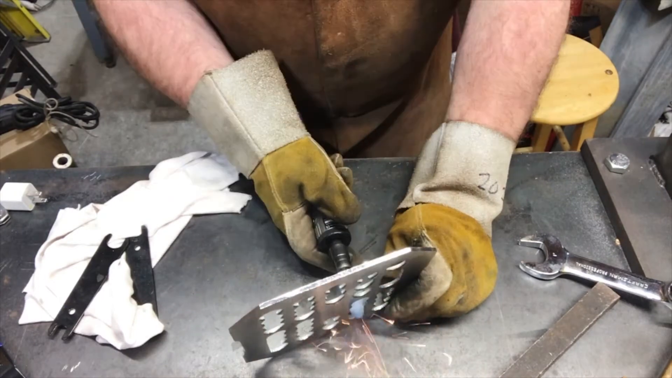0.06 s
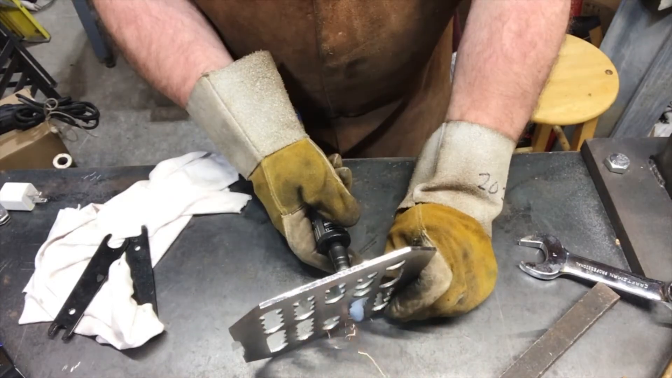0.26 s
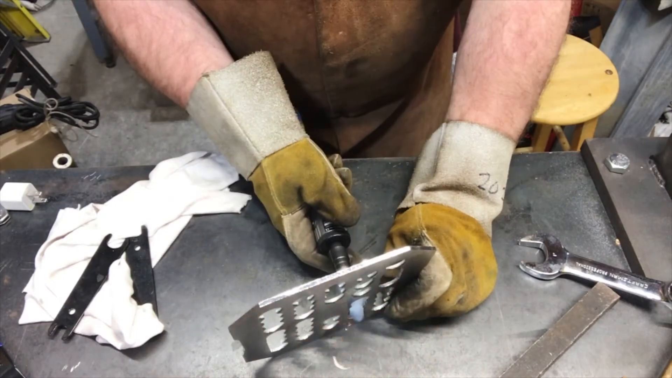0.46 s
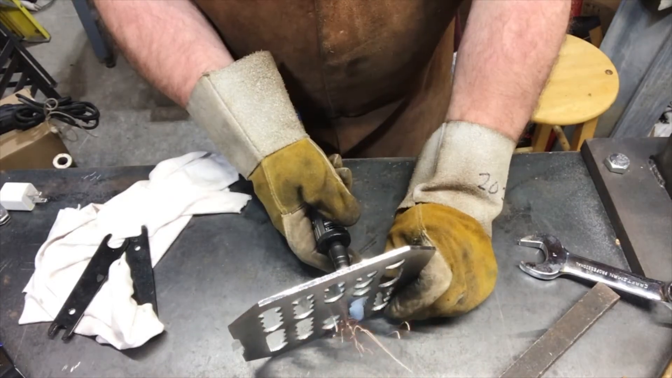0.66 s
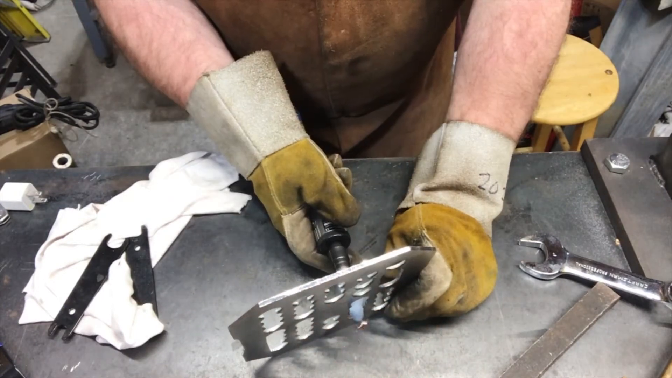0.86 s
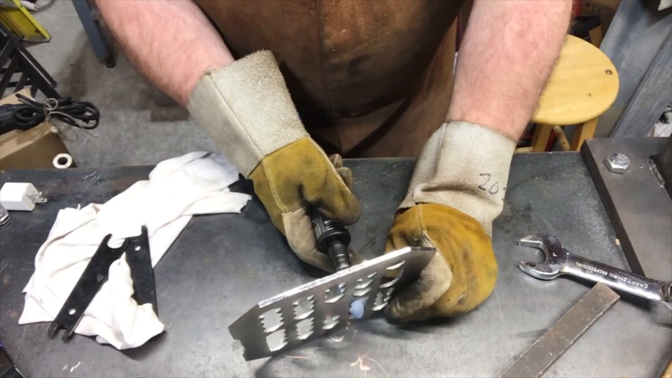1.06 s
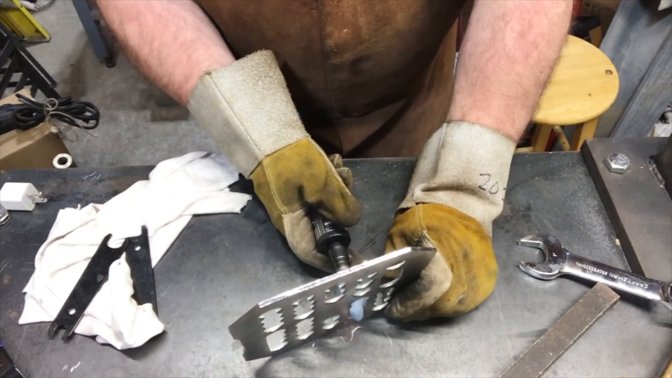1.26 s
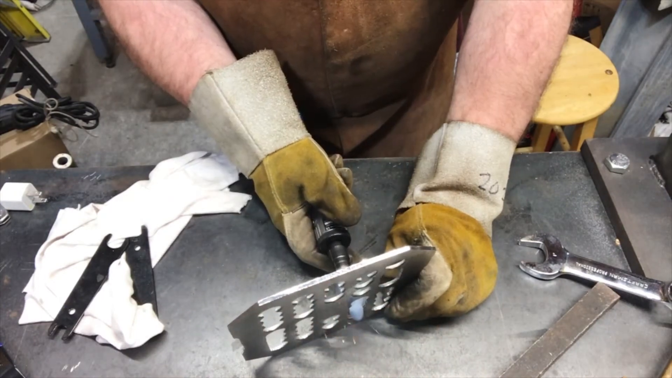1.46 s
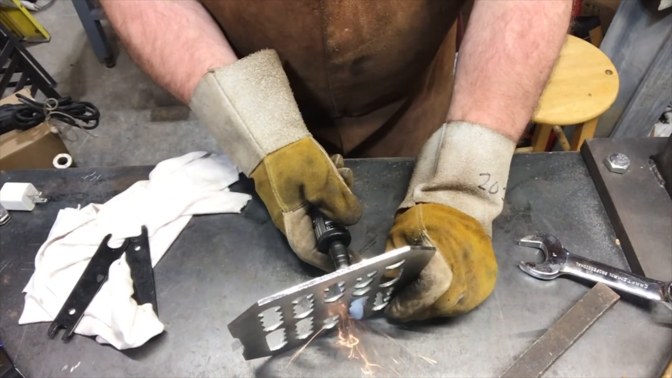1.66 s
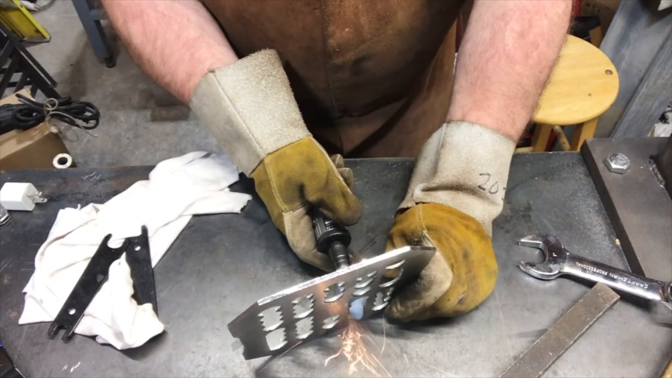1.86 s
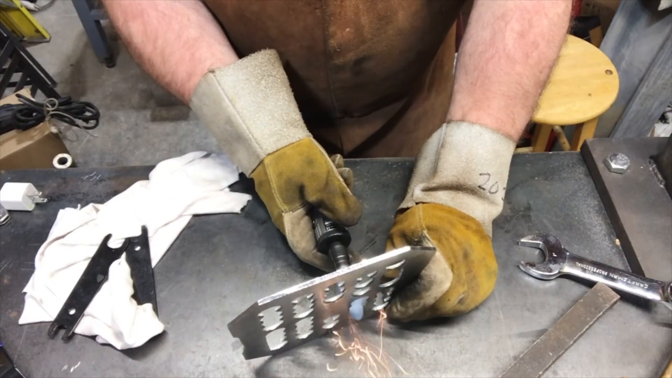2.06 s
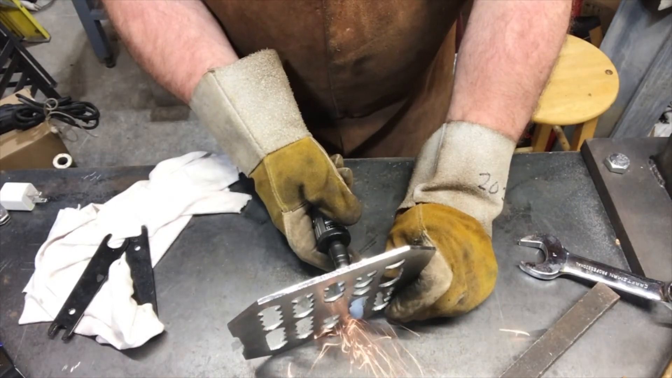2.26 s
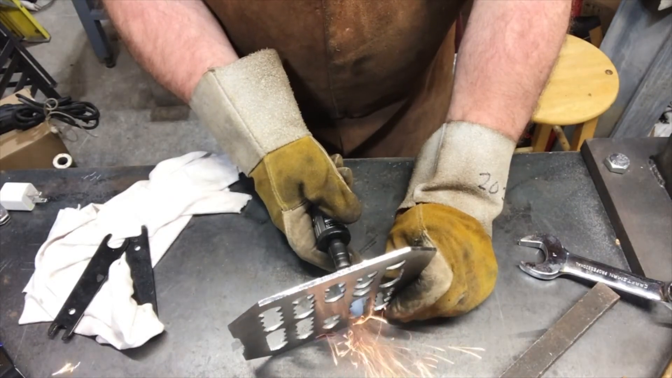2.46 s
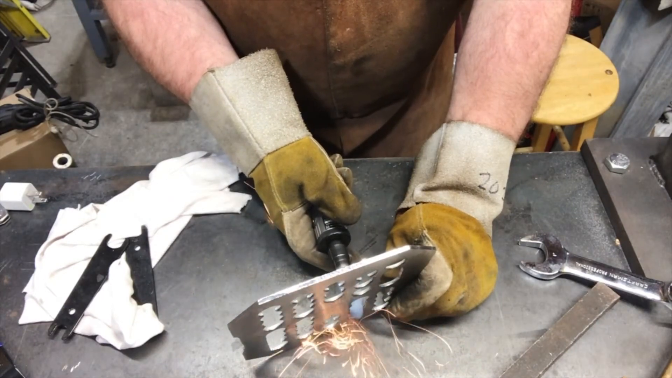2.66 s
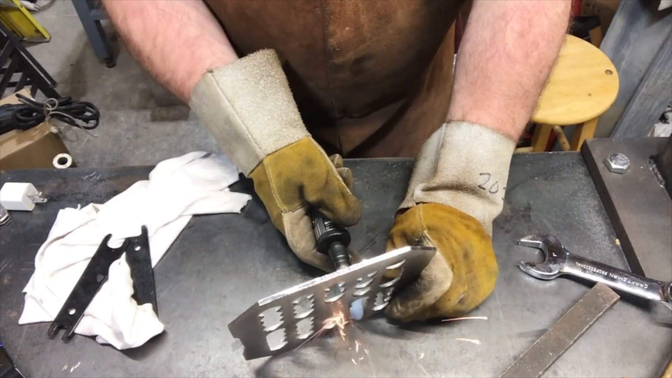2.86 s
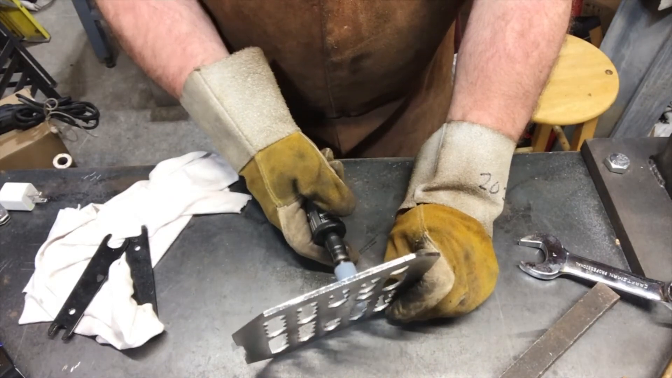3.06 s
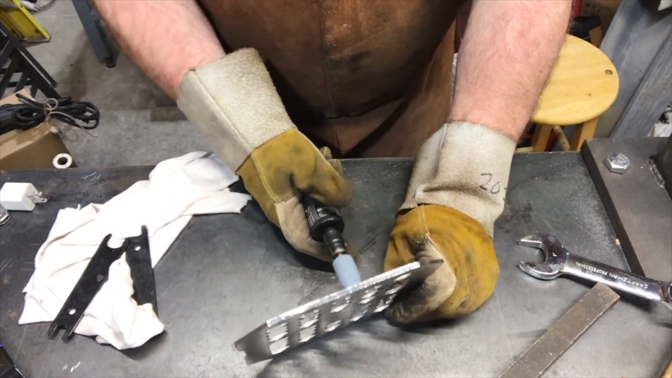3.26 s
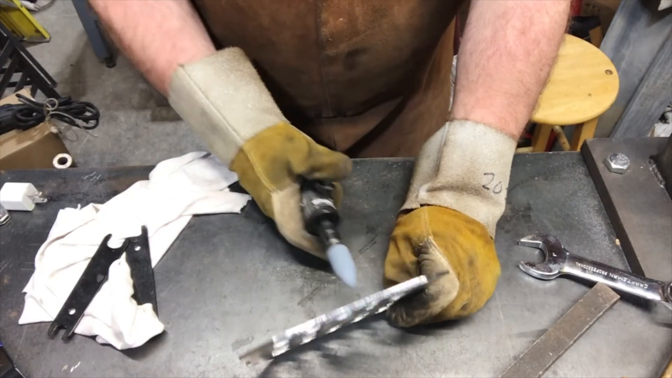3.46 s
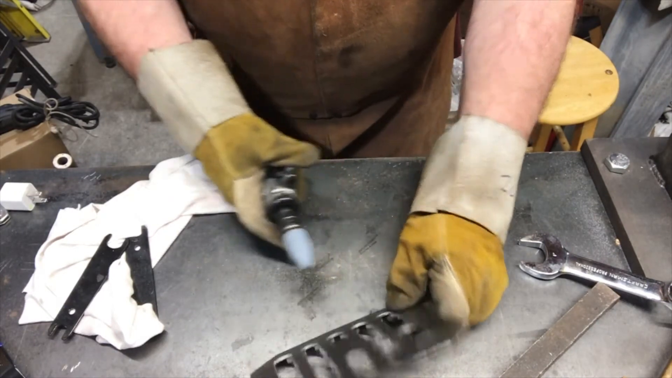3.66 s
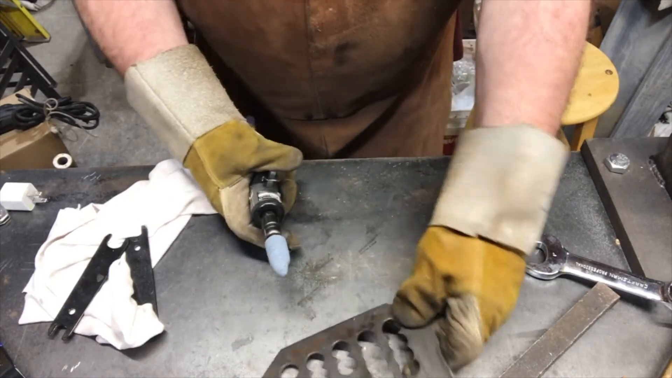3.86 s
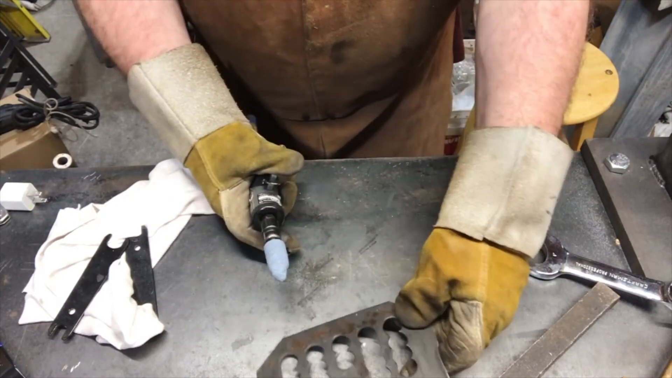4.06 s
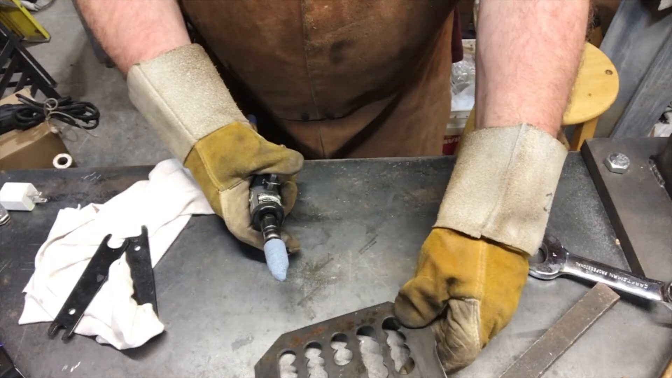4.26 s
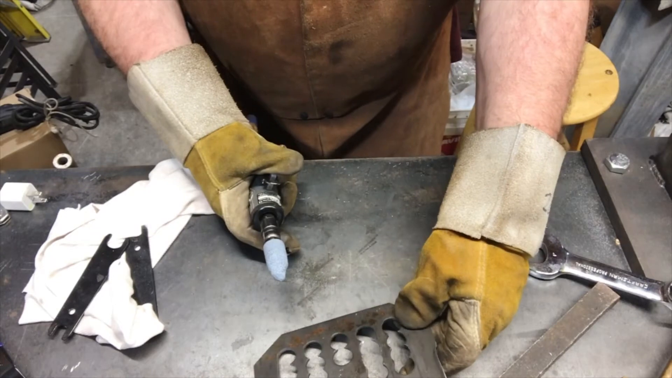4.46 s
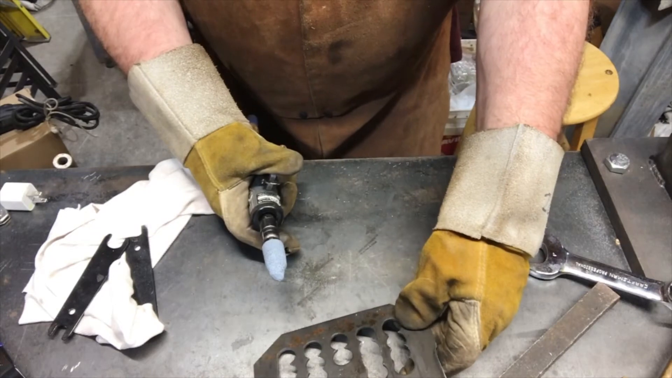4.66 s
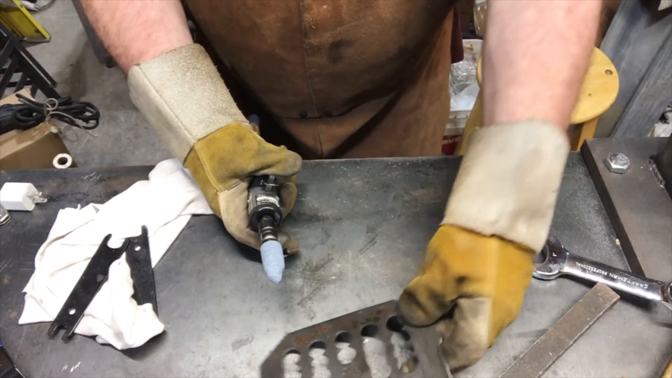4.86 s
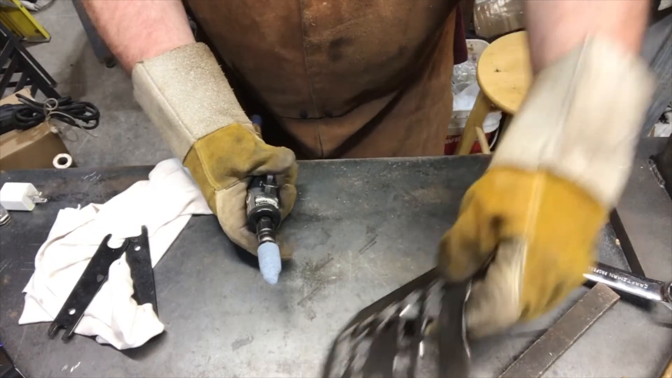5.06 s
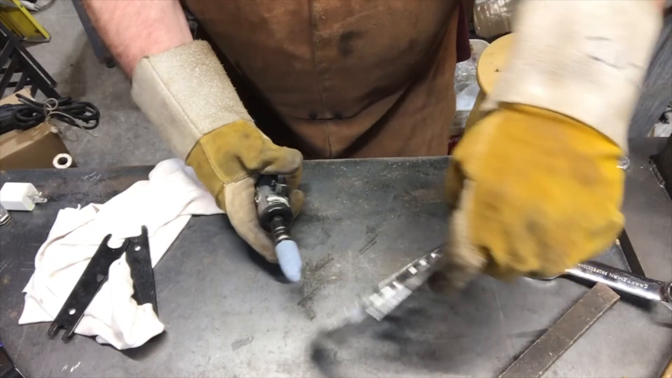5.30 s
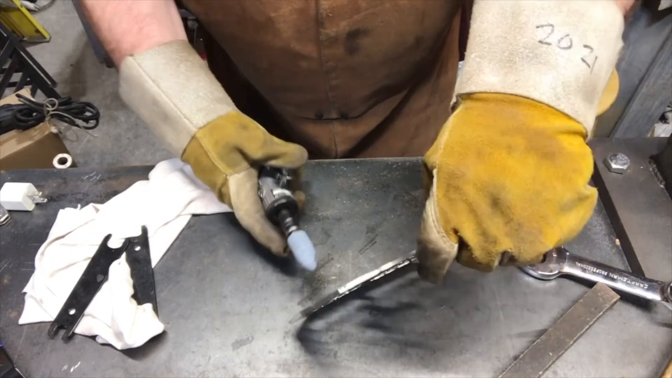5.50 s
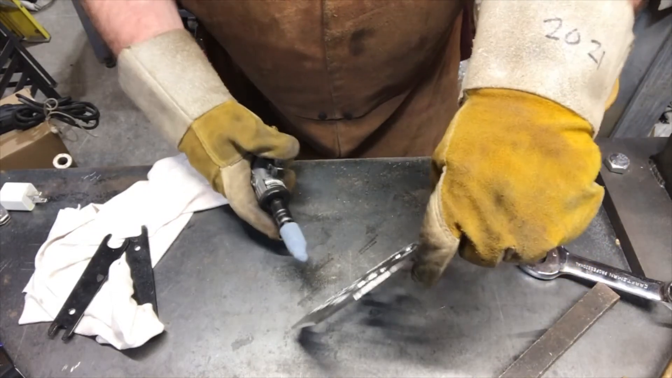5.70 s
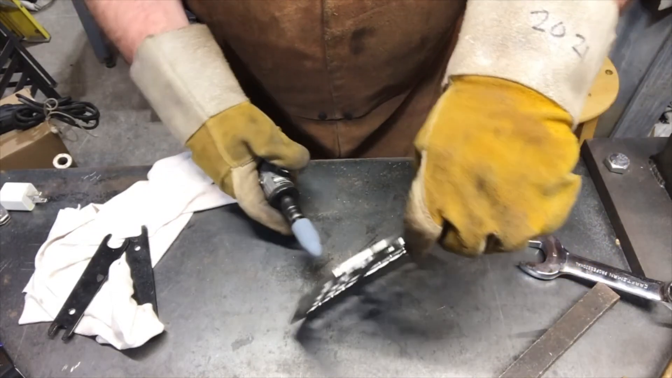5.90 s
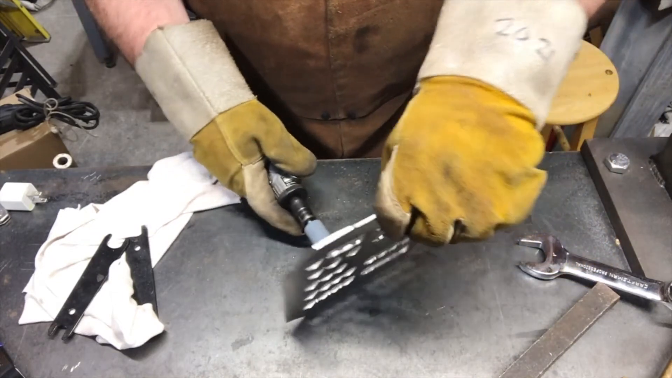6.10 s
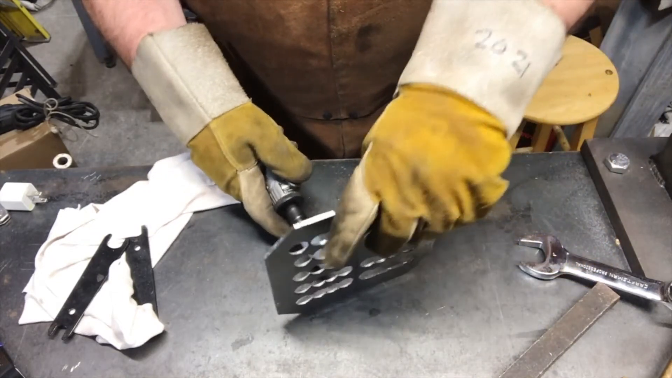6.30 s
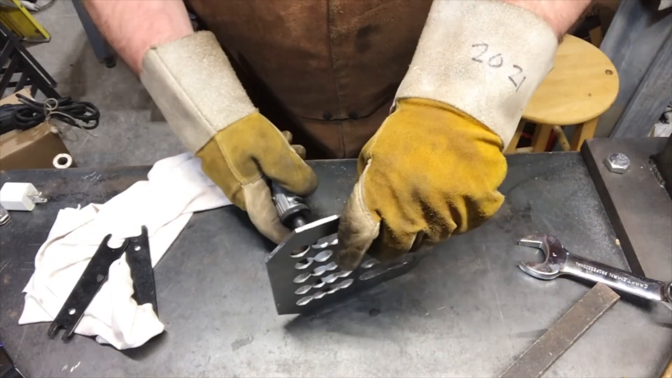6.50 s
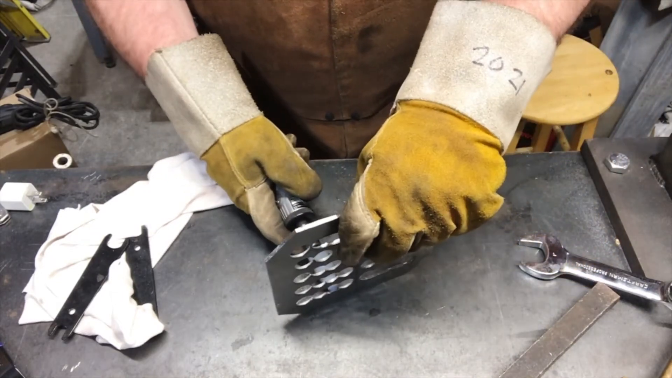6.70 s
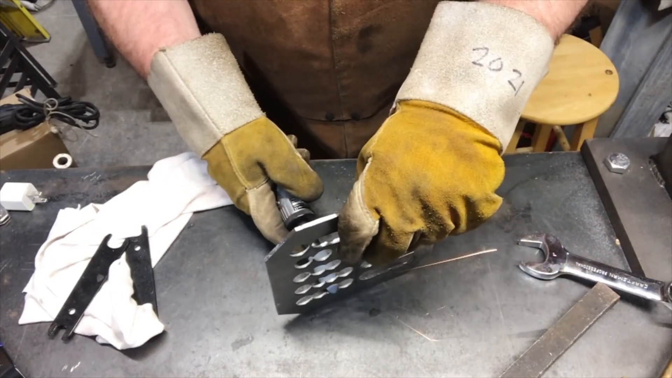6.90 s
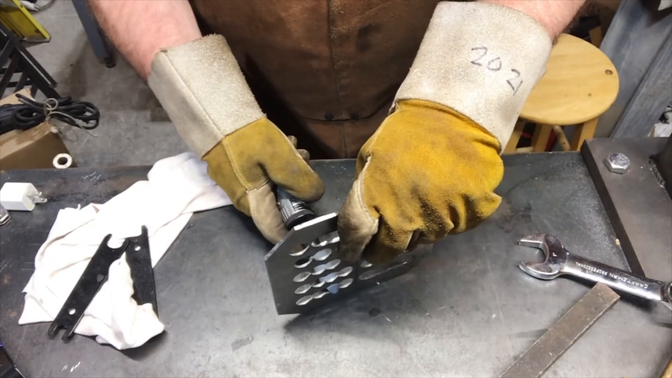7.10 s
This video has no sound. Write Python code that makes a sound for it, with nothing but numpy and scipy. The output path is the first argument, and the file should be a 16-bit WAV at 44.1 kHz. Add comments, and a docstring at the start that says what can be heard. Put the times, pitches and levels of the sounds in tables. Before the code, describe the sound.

A pneumatic die grinder whines and hisses as its stone tip bites a steel grate, drawing brief, thin squeals. The tool lifts off and winds down quickly, leaving a compressor droning in the background. The grate scrapes faintly and clinks on the workbench. Then the grinder spins up with a burst of air and goes back to grinding, close to the microphone in a garage.

```python
"""A four-vane air grinder whines and hisses while its stone bites a steel grate, which squeals.
The rotor sings at its shaft orders; the vanes chop the turbulent exhaust air.
The lever is released, the rotor spins down, the grate clinks on the bench, and the tool runs up again.
A piston compressor drones behind, heard best in the pause. Garage, close mono microphone."""
import sys
import numpy as np
from scipy import signal
from scipy.fft import rfft, irfft, next_fast_len
from scipy.io import wavfile
from scipy.ndimage import uniform_filter1d, map_coordinates

SR = 44100
rng = np.random.default_rng(int(sys.argv[2]) if len(sys.argv) > 2 else 0)


def generate_wav(sig):
    """Save sig (samples, or channels by samples) to the path in sys.argv[1] as 16-bit PCM at SR."""
    pcm = np.round(np.clip(np.atleast_2d(sig).T, -1, 1) * 32767).astype(np.int16)
    wavfile.write(sys.argv[1], SR, pcm)


N = 314874

# Rotor, lever held: time_s, shaft_hz, stone_pressure (about 0-1), vane_octave_swell_db
ROTOR_TRACK = [(0, 380.3, 0.1, -1), (.25, 382.5, 0.13, 0.5), (.8, 386.2, .1, -1.5), (1.04, 389.8, 0, 2),
               (1.42, 385, 0, -3), (1.57, 374, 0, 3), (1.68, 367, 0.35, -1), (1.82, 357.4, .92, -3),
               (2.06, 348.4, 1, 1), (2.22, 353, 1.06, -2), (2.42, 347, 0.69, 0.5), (2.52, 340, 1, -0.5),
               (2.68, 344.7, .7, 0.5), (2.8, 343.6, 0.81, -0.5), (2.92, 387.7, 0, 0),
               (3.05, 396.2, 0.06, 1.5), (3.28, 399.3, 0.01, 0), (6.06, 421.8, 0.01, 1),
               (6.28, 414, .15, -3.5), (6.42, 413.2, 0.16, -3), (6.51, 412, 0.68, -13),
               (6.77, 411.8, 0.77, -8), (6.89, 405, .82, 3), (7.02, 399, 1, 1), (7.14, 398.6, 0.99, -2)]
# Strong shaft orders: multiple, light_db, pressed_db, free_db, restart_light_db, restart_pressed_db,
# coast_db, run_up_db (last two add to the port response)
STRONG_ORDERS = [(1, -70.5, -53.5, -68, -65, -59, -40, -30), (2.003, -57.5, -65, -60.5, -55, -69, -34, -15),
                 (2.995, -57.5, -53, -67, -60, -65, -32, -25),
                 (3.997, -51, -39.5, -48.5, -48, -35, -0.5, -0.5),
                 (5.993, -55.5, -53, -58, -49, -36, -25, -23),
                 (7.99, -44.5, -44, -41.5, -34.5, -43, -18.5, -17),
                 (11.97, -41.5, -48, -41, -54, -43, -35, -30), (15.8, -70, -70, -70, -70, -70, -35, -45),
                 (20.2, -70, -70, -70, -70, -70, -44, -45), (23.9, -55, -59, -65, -70, -70, -43, -45)]
# Weak shaft orders: multiple, level_db, free_gain_db, restart_gain_db
WEAK_ORDERS = [(5, -60, 2, 4), (7, -59.5, 5, 5.5), (9, -59, 8, 8.5), (10, -57, 11, 1), (11, -51, 7, -12),
               (13, -53, -2, -6)]
# Exhaust port response: freq_hz, coast_db, run_up_db
PORT_RESPONSE = [(150.4, -94, -78), (279.6, -51, -44), (525, -35.5, -30), (680, -29, -35), (809, -21, -39),
                 (1040, -22, -34), (1270, -28.5, -41), (1770, -40, -35), (2550, -19, -31), (3200, -21, -14),
                 (4506, -28, -20), (6600, -3, -25), (9000, -20, -25)]
# Exhaust hiss: freq_hz, density_db
HISS_SPECTRUM = [(1470, -34), (2500, -50), (3150, -11.5), (3490, -13.5), (4680, 0.5), (5340, -8),
                 (5860, -6.5), (6840, -2.5), (8050, -12.5), (10500, -2.5), (11100, -5.5), (12600, -14.5),
                 (14300, -6), (15100, -6.5), (15900, -13)]
# Hiss with the grate turned towards the jet: freq_hz, density_db
JET_ON_GRATE_SPECTRUM = [(1470, -37), (2500, -4.5), (2700, -22), (3570, -9.5), (3860, -15), (4790, -2),
                         (5300, -5), (7450, 0), (8170, -1), (9540, -9), (12800, -18), (14300, -8),
                         (15900, -20)]
# Exhaust roar: freq_hz, density_db
ROAR_SPECTRUM = [(35, -58), (60, -30.5), (650, -9), (757, -7), (1440, -5.5), (1550, -3), (2490, -3.5),
                 (3160, -3), (3500, -19), (4550, -26), (7700, -120)]
# Bands gliding through the hiss as the grate moves: start_s, end_s, from_hz, to_hz, width_hz, gain_db
POCKET_BANDS = [(2.9, 3.32, 8800, 8000, 410, 7), (3.3, 3.6, 12000, 9500, 700, 3),
                (3.33, 3.78, 6600, 6400, 250, 17), (5.88, 6.12, 6800, 8600, 280, 9),
                (5.875, 6.02, 5000, 5600, 580, 10), (5.98, 6.27, 6100, 6930, 480, 8.5),
                (6.2, 6.53, 6800, 7400, 400, 4.5), (5.95, 6.2, 4060, 4800, 200, 4),
                (5.86, 6.08, 10300, 10800, 910, 9.5), (6.04, 6.36, 10100, 9920, 330, 10.5),
                (6.08, 6.3, 7900, 8400, 560, -6.5), (5.9, 6.14, 6100, 7600, 300, -8),
                (5.84, 6.2, 3900, 4600, 210, -5), (6.1, 6.5, 4800, 5600, 300, -5),
                (3.3, 3.41, 4000, 3900, 280, 9), (6.42, 7.4, 4950, 4750, 120, 6)]
# Harder bites of the stone: centre_s, length_s, level_db
STONE_BITES = [(.25, .12, -41), (0.435, 0.026, -29.5), (0.535, .05, -30.5), (.65, .05, -39),
               (.76, .1, -36.5), (.97, .06, -37), (1.22, .12, -44), (1.406, 0.084, -34),
               (1.504, 0.015, -30.5), (1.62, .08, -39), (1.748, .04, -39), (1.84, .05, -39),
               (2.017, 0.11, -32), (2.359, 0.097, -45), (2.55, 0.057, -39), (2.861, .06, -44)]
# Squealing grate modes: pitch_hz, wobble_rate_hz, drift_hz, level_db
SQUEAL_MODES = [(10790, 25, 28, 0), (9050, 25, 10, -13)]
# Grate touching the bench: start_s, level_db, tilt_db_per_octave
BENCH_TOUCHES = [(4.94, -45, 14), (4.958, -28.5, 18), (5.037, -43, 8), (5.239, -36, -3),
                 (5.252, -39.5, -2.5), (5.264, -40, -2)]
# Ringing grate modes: pitch_hz, level_db, t60_s
GRATE_MODES = [(2104, 3.5, 0.072), (2460, -6, 0.16), (3450, -7, 0.16), (4250, 2, 0.27), (5200, -12, 0.16),
               (7100, -6, .2), (7740, -15, .11), (8100, -3, .13), (8440, -2, 0.12), (9000, -12, 0.13),
               (9600, -3, 0.1), (10500, -10, 0.11), (11030, -13, .12), (12300, -9, .1), (12890, -16, 0.16),
               (14000, -18, .1), (15200, -16, .1)]
# Grate dragged on the bench: time_s, level_db
DRAG_TRACK = [(4.82, -77), (4.87, -59), (5.03, -68), (5.16, -59), (5.32, -63), (5.42, -75), (5.6, -91)]
# Compressor stroke orders: multiple, level_db
STROKE_ORDERS = [(1, -29), (2, -14), (3, -20), (4, -19), (5, -18.5), (6, -14), (7, -12), (8, -14),
                 (9, -0.5), (10, -11), (11, -37), (12, -24), (13, -28), (14, -18), (17, -9.5), (18, -10),
                 (19, -31.5), (20, -18.5), (22, -19.5), (23, -15.5), (24, -39)]
# Cylinder head and tank modes: pitch_hz, width_hz, level_db
HEAD_MODES = [(1140, 35, -1), (1275, 40, 0), (1570, 35, 2), (1845, 30, -5), (2245, 40, -5), (3800, 45, -4),
              (4420, 160, -4), (4610, 50, -4), (6420, 90, -13)]
# Valve and intake noise: freq_hz, density_db
INTAKE_SPECTRUM = [(24, -38), (40, -15), (151, -25), (297, -7.5), (372, -12), (583, -13.5), (962, -18),
                   (1270, -21), (2430, -17), (4550, -14), (5550, -23.5), (14700, -37), (15900, -29)]

LIFT_S, SHUT_S, OPEN_S = 2.94, 3.31, 5.79  # stone lifted, lever released, lever pressed
EMPTY_S, EMPTY_DB_PER_S = SHUT_S + 0.33, 260  # housing runs empty
FREE_FLOW_DB, RESTART_FLOW_DB = -1.5, 3
VANES = 4
TIME_S = np.arange(N) / SR
RESTART = TIME_S > 5  # restart settings apply from within the pause


def shaft(coast_s=.11, valve_s=.01, creep=.05):
    """Rotor speed and unsteady angle: coasts down as the valve closes, runs up on an S-curve."""
    held_hz = curves(ROTOR_TRACK)[0]
    shut_s = since(SHUT_S)
    coast = coast_s * np.exp(-shut_s / coast_s) - valve_s * np.exp(-shut_s / valve_s)
    speed = np.where(RESTART, step(5.907, .028), coast / (coast_s - valve_s))
    shaft_hz = held_hz * (creep + (1 - creep) * speed)
    unsteady_hz = shaft_hz * (1 + 0.0008 * wobble(40)) + 0.00403 * (400 - shaft_hz) * wobble(150)
    return shaft_hz, 2 * np.pi * np.cumsum(unsteady_hz) / SR


def air_supply(bleed_s=0.098, fill_s=0.064, gust_s=.2):
    """Air bleeds off and refills with the lever. Returns flow_db and 0-1 weights: free, shut, gust."""
    free = step(LIFT_S, 0.024) * ~RESTART
    shut = (1 - np.exp(-since(SHUT_S) / bleed_s)) * ~RESTART
    gust = np.exp(-since(OPEN_S) / gust_s) * RESTART
    drain_db = -32 * shut - EMPTY_DB_PER_S * since(EMPTY_S)
    fill_db = -29.5 * np.exp(-since(OPEN_S) / fill_s) - 1500 * until(OPEN_S)
    flow_db = np.where(RESTART, fill_db + RESTART_FLOW_DB, drain_db + FREE_FLOW_DB * free)
    return flow_db, free, shut, gust


def rotor_whine(shaft_hz, angle, bark_s=3.343, settle_s=5.97):
    """Shaft orders follow stone pressure; coasting and running up, they sweep the port response."""
    def tone(order, level_db):
        gain = np.sqrt(2) * amp(level_db + 0.19 * order * wobble(50))
        return gain * np.sin(order * angle + 0.042 * order * wobble(120) + rng.uniform(0, 2 * np.pi))

    flow_db, free, _, _ = air_supply()
    _, pressure, swell_db = curves(ROTOR_TRACK)
    gliding = step(bark_s, 0.0017) - step(settle_s, .012)  # bark: rotor pumps against the shut valve
    empty_db = -EMPTY_DB_PER_S * np.minimum(since(EMPTY_S), 10 * until(OPEN_S))
    starve_db = 2.5 * (flow_db - FREE_FLOW_DB * free) * ~RESTART
    port_hz, port_coast_db, port_run_up_db = np.transpose(PORT_RESPONSE)
    whine = 0
    for order, light_db, pressed_db, free_db, *later_db in STRONG_ORDERS:
        restart_light_db, restart_pressed_db, coast_db, run_up_db = later_db
        held_db = np.where(RESTART, restart_light_db + pressure * (restart_pressed_db - restart_light_db),
                           light_db + pressure * (pressed_db - light_db) + free * (free_db - light_db))
        if round(order) == 2 * VANES:
            held_db += swell_db
        if round(order) in (VANES, 3 * VANES):
            held_db += starve_db
        pitch_hz = order * shaft_hz
        glide_db = np.where(RESTART, log_interp(pitch_hz, port_hz, port_run_up_db) + run_up_db,
                            log_interp(pitch_hz, port_hz, port_coast_db) + coast_db)
        whine += tone(order, held_db + gliding * (glide_db + empty_db - held_db) + 1.3 * wobble(12))
    for order, level_db, free_gain_db, restart_gain_db in WEAK_ORDERS:
        held_db = level_db + free_gain_db * free + restart_gain_db * RESTART
        whine += tone(order, held_db + flow_db + 1.4 * wobble(6.7))
    return whine


def pocket_hiss():
    """Jet noise in random patches, coloured by the grate pocket it blows into."""
    jet = np.where(RESTART, noise(JET_ON_GRATE_SPECTRUM), noise(HISS_SPECTRUM))
    freq_hz, frame_s, spectrum = signal.stft(jet, SR, nperseg=512)
    colour_db = 0
    for start_s, end_s, from_hz, to_hz, width_hz, gain_db in POCKET_BANDS:
        progress = np.clip((frame_s - start_s) / (end_s - start_s), 0, 1)
        centre_hz = to_hz + (from_hz - to_hz) * (1 - progress) ** 1.6
        swell = np.abs(np.sin(np.pi * progress ** 0.77)) ** 0.77
        colour_db += gain_db * swell / (1 + ((freq_hz[:, None] - centre_hz) / width_hz) ** 2)
    patches = uniform_filter1d(rng.standard_normal(spectrum.shape), 5, axis=0)
    patches_db = 0.99 * unit_rms(uniform_filter1d(patches, 16, axis=1))
    return signal.istft(spectrum * amp(colour_db + patches_db), SR, nperseg=512)[1][:N]


def exhaust(angle):
    """Turbulent air: hiss chopped by the vanes, roar pushed out in puffs while they coast."""
    flow_db, free, shut, gust = air_supply()
    treble_db = -1 - 0.5 * free - 2 * shut + 6 * RESTART + 8 * gust
    roar_db = -15 + 1.5 * free + 19 * shut - 3 * RESTART + 18.5 * gust
    hiss = pocket_hiss()
    treble = filtered(hiss, lambda hz: 1 / (1 + (11500 / (hz + 1)) ** 12))
    chop = 1 + 0.05 * np.sin(VANES * angle) + 0.074 * np.sin(angle)
    hiss = (hiss - treble + treble * amp(treble_db)) * chop * amp(0.28 * wobble(25))
    puffs = 1 + .9 * shut * np.cos(VANES * angle)
    roar = amp(roar_db) * puffs * noise(ROAR_SPECTRUM)
    return amp(flow_db - 29.5) * (hiss + roar)


def grate_squeal(edge_db_per_s=502):
    """Each harder bite of the stone excites two narrow, drifting grate modes."""
    bites = sum(amp(level_db - edge_db_per_s * np.maximum(np.abs(TIME_S - centre_s) - length_s / 2, 0))
                for centre_s, length_s, level_db in STONE_BITES)
    modes = 0
    for pitch_hz, rate_hz, drift_hz, level_db in SQUEAL_MODES:
        gain = np.sqrt(2) * amp(level_db + 2.7 * wobble(rate_hz))
        phase = 2 * np.pi * np.cumsum(pitch_hz + drift_hz * wobble(14)) / SR
        modes += gain * np.sin(phase + wobble(rate_hz))
    return bites * modes


def grate_clinks(thud_t60_s=.12, attack_s=0.0006):
    """Each touch on the bench rings the grate; brighter touches thud less."""
    clinks, age_s = np.zeros(N + SR), np.arange(SR // 3) / SR
    thud_band = signal.butter(2, [300, 4500], "band", fs=SR)
    attack = 1 - np.exp(-age_s / attack_s)
    for start_s, level_db, tilt_db_per_octave in BENCH_TOUCHES:
        ring = 0
        for pitch_hz, mode_db, t60_s in GRATE_MODES:
            tilt_db = tilt_db_per_octave * min(np.log2(pitch_hz / 10000), .1)
            decay = amp(mode_db + tilt_db + rng.normal(0, 3.2) - 60 * age_s / t60_s)
            ring += decay * np.sin(2 * np.pi * pitch_hz * age_s + rng.uniform(0, 7.3))
        thud = signal.lfilter(*thud_band, rng.standard_normal(len(age_s)))
        thud *= amp(11 - 2 * tilt_db_per_octave - 60 * age_s / thud_t60_s)
        clinks[round(start_s * SR):][:len(age_s)] += amp(level_db - 10) * (ring + thud) * attack
    return clinks[:N]


def grate_drag(width_hz=150):
    """Dragging on the bench rubs the grate modes."""
    modes = [(hz, width_hz, level_db + 6 * np.log2(hz / 10000)) for hz, level_db, _ in GRATE_MODES]
    return amp(curves(DRAG_TRACK)[0] + 3.8 * wobble(30)) * resonate(rng.standard_normal(N), modes)


def compressor(stroke_hz=33.25, cut_in_s=0.76):
    """Two unequal strokes a turn throb; valve knocks ring the head; intake noise pulses."""
    angle = 2 * np.pi * np.cumsum(stroke_hz * (1 + .0004 * wobble(3))) / SR
    drone = 0
    for order, level_db in STROKE_ORDERS:
        gain = np.sqrt(2) * amp(level_db + wobble(8))
        throb = 1 + (.1 + .45 * (order > 12)) * np.cos(angle / 2)
        capped = min(order, 10)  # delay grows up to order 10: each thump glides upward
        lag_rad = .24 * capped * (2 * order - capped) + rng.normal(0, .3)
        drone += gain * throb * np.cos(order * angle - lag_rad)
    turns = angle / (4 * np.pi)
    knocks = sum(size * np.diff(np.floor(turns + offset), prepend=0)
                 for offset, size in [(0, 0.4), (.45, 0.53)])
    head = amp(-9.5) * resonate(knocks * amp(wobble(30)), HEAD_MODES)
    rattle = amp(-6.5 + 1.7 * wobble(2.86)) * resonate(rng.standard_normal(N), HEAD_MODES)
    intake = amp(0.5) * noise(INTAKE_SPECTRUM)
    puff = 1 + 0.037 * np.cos(angle)
    pause = step(SHUT_S + 0.31, 0.155) - step(OPEN_S + 0.094, 0.047)
    gain_db = -77.5 + 17 * step(cut_in_s, 0.014) + 12 * pause
    return amp(gain_db) * (drone + head + puff * (rattle + intake))


def amp(db):
    return 10 ** (np.asarray(db) / 20)


def unit_rms(x):
    return x / np.sqrt(np.mean(x ** 2) + 1e-20)


def since(start_s):
    return np.maximum(TIME_S - start_s, 0)


def until(end_s):
    return np.maximum(end_s - TIME_S, 0)


def step(centre_s, width_s):
    """Smooth rise from 0 to 1."""
    return .5 + .5 * np.tanh((TIME_S - centre_s) / width_s / 2)


def log_interp(hz, points_hz, points_db):
    return np.interp(np.log(hz + 1), np.log(points_hz + 1), points_db)


def curves(track):
    """One per-sample curve for each column after time_s."""
    time_s, *columns = np.transpose(track)
    return [np.interp(TIME_S, time_s, column) for column in columns]


def wobble(rate_hz):
    """Smooth random curve through rate_hz knots a second."""
    return map_coordinates(rng.standard_normal(int(N * rate_hz / SR) + 4), [TIME_S * rate_hz])


def filtered(x, response):
    """Apply the gain response(hz)."""
    size = next_fast_len(N + 8192)
    return irfft(rfft(x, size) * response(np.fft.rfftfreq(size, 1 / SR)), size)[..., :N]


def noise(spectrum):
    """Coloured noise, rms 1."""
    points = np.transpose(spectrum)
    return unit_rms(filtered(rng.standard_normal(N), lambda hz: amp(log_interp(hz, *points))))


def resonate(x, modes):
    """Ring causal modes of alternating sign; rms 1."""
    def response(hz):
        return sum((-1) ** k * amp(db) * 1j * hz * width_hz / (mode_hz**2 - hz**2 + 1j * hz * width_hz)
                   for k, (mode_hz, width_hz, db) in enumerate(modes))
    return unit_rms(filtered(x, response))


def scene():
    """Grinder, grate and compressor, same on both channels."""
    shaft_hz, angle = shaft()
    grinder = rotor_whine(shaft_hz, angle) + exhaust(angle)
    mono = grinder + grate_squeal() + grate_clinks() + grate_drag() + compressor()
    return np.array([mono, mono])


def record(dry, ceiling=0.24, top_hz=15750):
    """The microphone rounds off peaks and cuts everything above its band limit."""
    rounded = dry / (1 + np.abs(dry / ceiling) ** 3) ** (1 / 3)
    return filtered(rounded, lambda hz: hz < top_hz)


dry = scene()
out = record(dry)
generate_wav(out)
```